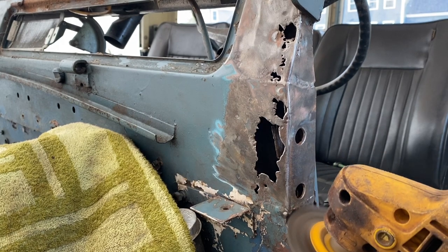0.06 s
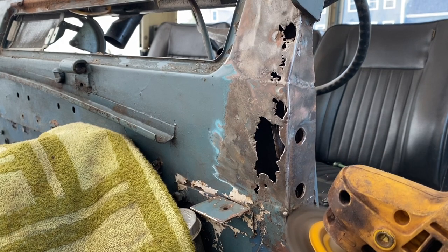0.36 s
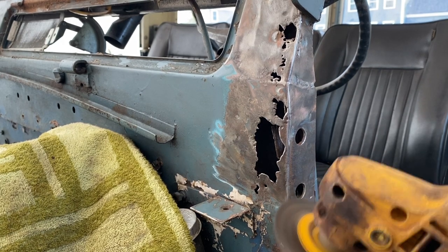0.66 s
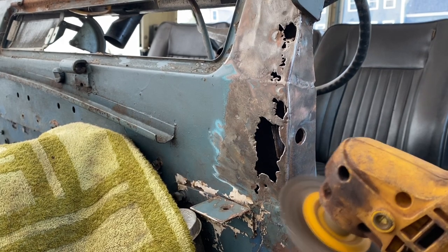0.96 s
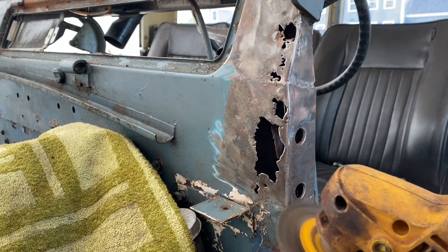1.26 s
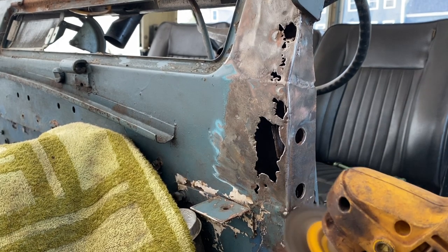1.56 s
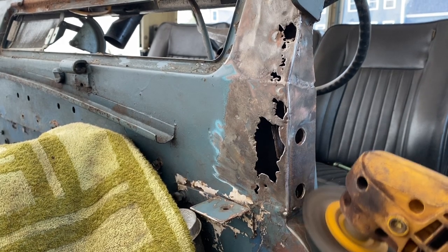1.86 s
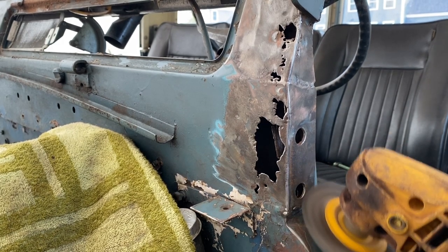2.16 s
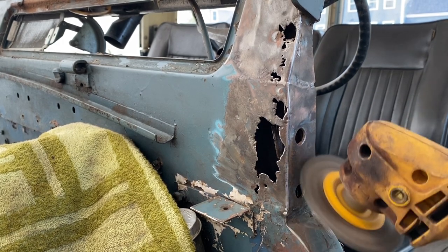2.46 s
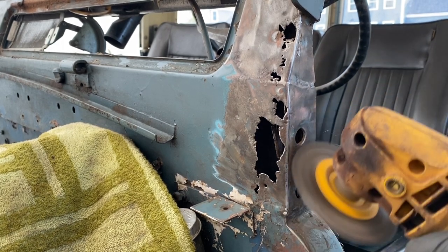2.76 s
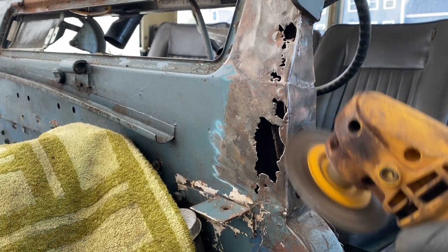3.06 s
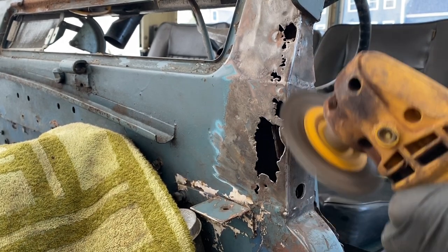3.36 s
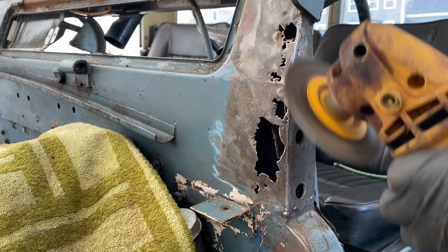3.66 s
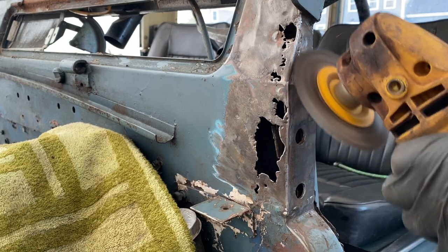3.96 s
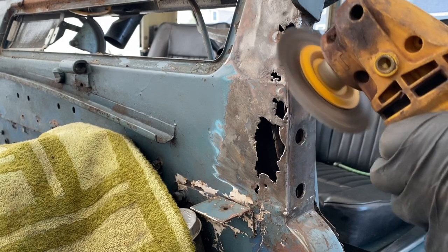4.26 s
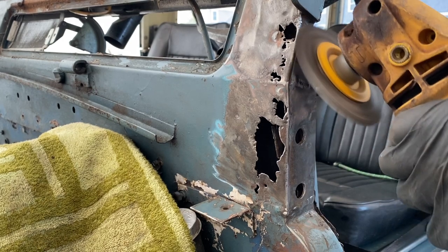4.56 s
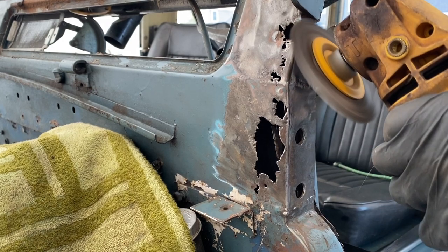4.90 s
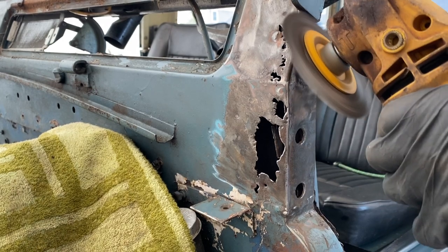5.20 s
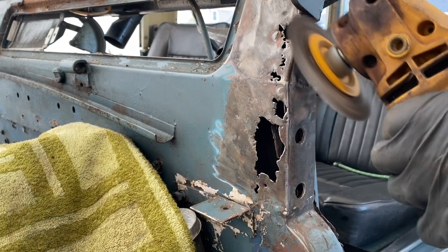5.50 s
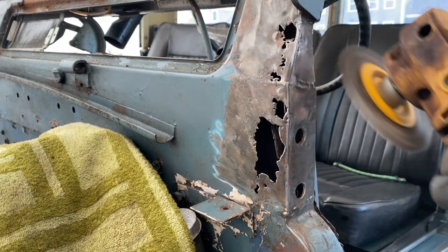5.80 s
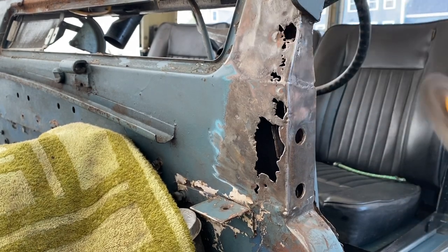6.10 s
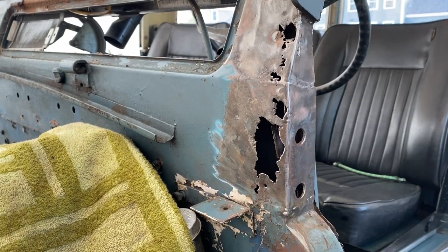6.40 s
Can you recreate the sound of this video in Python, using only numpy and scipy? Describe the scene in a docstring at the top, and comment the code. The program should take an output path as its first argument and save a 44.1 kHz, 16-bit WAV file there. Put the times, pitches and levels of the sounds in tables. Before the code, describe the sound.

Close up, a wire wheel on an angle grinder is pressed repeatedly against rusty car steel in a workshop. The bristles scratch and hiss while the metal gives a high, chattering whine that sags in pitch under pressure. The motor and fan run underneath, and low puffs of air hit the microphone early on. Finally the scrubbing stops, and the free wheel whirs faster, then begins winding down.

```python
"""In a workshop, an angle grinder with a wire wheel scrubs the rusty door pillar of a stripped car.
Its draught buffets the microphone, its fan rushes, its motor and gears sing with the wheel speed.
It is pressed on in short strokes: the wires hiss, rasp and snag, the tufts make the steel whine.
Near the end it is lifted off, spins up freely and coasts down."""
import sys
import numpy as np
from scipy import signal
from scipy.fft import rfft, irfft
from scipy.io import wavfile
from scipy.ndimage import uniform_filter1d, map_coordinates

SR = 44100
rng = np.random.default_rng(int(sys.argv[2]) if len(sys.argv) > 2 else 0)


def pcm_store(signal):
    """Save signal as 16-bit PCM."""
    levels = np.round(np.clip(np.atleast_2d(signal), -1, 1) * 32767)
    wavfile.write(sys.argv[1], SR, levels.astype(np.int16).T)


N = 293000
TIME = np.arange(N) / SR
FREQS = np.maximum(np.fft.rfftfreq(N, 1 / SR), 1)
CUTOFF_HZ = 15900


def from_db(db):
    """Decibels to gain."""
    return 10 ** (np.asarray(db) / 20)


def unit_rms(x):
    """Scale to rms 1."""
    return x / np.sqrt(np.mean(x ** 2) + 1e-20)


def evened(x, span_s):
    """Hold the running rms near 1."""
    power = np.mean(np.atleast_2d(x) ** 2, axis=0)
    return x / np.sqrt(uniform_filter1d(power, int(span_s * SR)) + 1e-9)


def in_time(rows):
    """Interpolate each column at every sample."""
    time_s, *columns = np.transpose(rows)
    return [np.interp(TIME, time_s, column) for column in columns]


def over_hz(points):
    """Interpolate over log frequency."""
    hz, value = np.transpose(points)
    return np.interp(np.log(FREQS), np.log(hz), value)


def bump(centre_s, sigma_s):
    """Gaussian swell, height 1."""
    return np.exp(-.5 * np.minimum(((TIME - centre_s) / sigma_s) ** 2, 60))


def white():
    """Two independent white noises."""
    return rng.standard_normal((2, N))


def drift(rate_hz, size=73728):
    """Random wander, rolled off above rate_hz; rms 1."""
    slow = irfft(rfft(rng.standard_normal(size)) / (1 + (FREQS[:size // 2 + 1] / rate_hz) ** 2))
    return unit_rms(np.interp(np.linspace(0, size - 1, N), np.arange(size), slow))


def resonant(x, modes):
    """Each row boosts or cuts the band around its frequency."""
    response = 1 + sum((from_db(db) - 1) / (1 + 2j * (FREQS - hz) / width) for hz, width, db in modes)
    return irfft(rfft(x) * response, N)


def cabin(x, t60_s, wet_db):
    """Dense short echoes of the bare body shell, different on each side."""
    t = TIME[:SR // 2]
    echoes = rng.standard_normal((2, len(t))) * from_db(-60 * t / t60_s) * (t > .002)
    echoes /= np.sqrt(np.sum(echoes ** 2, axis=1, keepdims=True))
    return x + from_db(wet_db) * signal.fftconvolve(x, echoes, axes=1)[:, :N]


# left-right similarity: freq_hz, likeness (unclipped)
STEREO_LIKENESS = [(60, 0.94), (200, 1), (450, 0.26), (1200, 0.5), (2300, 0.68), (3300, 0.4), (4200, 0.33),
                   (5700, -0.26), (6700, 0.5), (7500, 0.8), (8400, -4), (10500, 1.05), (12000, -1),
                   (13400, 1), (15200, -11)]

def coloured(pair, spectrum, width=1):
    """Shape two independent signals into mid and side with this spectrum; stereo, rms 1."""
    alike = np.clip(over_hz(STEREO_LIKENESS), -.9, .95)
    mid, side = irfft(rfft(pair) * from_db(over_hz(spectrum)) * np.sqrt([1 + alike, 1 - alike]), N)
    return unit_rms(np.array([mid + width * side, mid - width * side]))


# draught, fading as the wheel moves up the pillar: time_s, level_db
DRAUGHT_LEVEL = [(0, -50), (.3, -46), (.7, -44.5), (1.1, -38), (1.65, -49), (2.05, -41.5), (2.4, -44),
                 (2.55, -50), (2.8, -51), (3.2, -41), (3.6, -45.5), (3.9, -52.5), (4.48, -51.5), (4.6, -63),
                 (5.8, -62), (6.64, -60)]
# stereo width of the wind rumble, wide at first, narrowing after two seconds: time_s, side_gain_db
DRAUGHT_WIDTH = [(0, 7.5), (1.7, 12), (2.1, -2), (5, -64), (6.64, 11)]
# the wheel's jet sweeps the microphone: centre_s, peak_db, sigma_s
GUSTS = [(0.024, -29, .008), (0.12, -34, .014), (0.424, -28, 0.0081), (0.569, -37, .012), (0.68, -39, .015),
         (0.887, -36, 0.017), (1.194, -35, 0.016), (1.434, -38, 0.016), (1.59, -38, 0.012),
         (1.77, -40, 0.028), (1.979, -33.5, 0.018), (2.2, -35, 0.012), (2.268, -30, 0.024),
         (2.352, -32, 0.017), (2.635, -28.5, .009), (2.664, -34, 0.008), (2.868, -36, .007),
         (2.9, -29, 0.018), (2.968, -38, .015), (3.089, -31, .012), (3.146, -29.5, 0.014),
         (3.276, -32.5, .02), (3.375, -32, 0.014), (3.416, -28, 0.014), (3.556, -41, .015),
         (6.026, -42, .012)]
# wind spectra: freq_hz, density_db
DRAUGHT_SPECTRUM = [(15, -24), (28, -21), (45, 3), (65, 2.5), (100, 0), (150, -6), (220, -10), (350, -19.5),
                    (800, -30.5)]
GUST_SPECTRUM = [(20, -17), (55, 1.5), (130, 3.5), (230, -7), (380, -12), (900, -24)]

def draught():
    """Air flung off the wheel hits the microphone in lumps."""
    level_db, = in_time(DRAUGHT_LEVEL)
    width = from_db(in_time(DRAUGHT_WIDTH)[0])
    lumps_db = 2.8 * drift(12)
    rumble = from_db(level_db + lumps_db) * coloured(white(), DRAUGHT_SPECTRUM, width)
    gust_gain = sum(from_db(db) * bump(centre_s, sigma_s) for centre_s, db, sigma_s in GUSTS)
    gusts = gust_gain * coloured(white(), GUST_SPECTRUM, width)
    return (rumble + gusts) * from_db([[.7], [-.7]])


# fan rush: time_s, level_db
FAN_LEVEL = [(0, -31), (1.3, -32.5), (1.6, -33.5), (2.25, -30), (4.2, -32.5), (4.3, -33), (5.7, -33.5),
             (6.08, -29.5), (6.58, -35)]
# fan rush: freq_hz, density_db
FAN_SPECTRUM = [(40, -36), (130, -59), (230, -18.5), (420, -8), (600, -3.5), (800, -2.5), (1100, 2),
                (1600, 0.5), (2200, -1.5), (2900, -1), (3800, -7.5), (6500, -8.5), (9000, -40),
                (16000, -27)]
# car body cavities: freq_hz, width_hz, gain_db
BODY_MODES = [(445, 40, 3), (775, 72, 5.5), (901, 16, 7.5), (1294, 48, 2.5), (1400, 40, 2),
              (1673, 200, 3.5), (1860, 140, 2.5)]
# vent direction: freq_hz, left_minus_right_db
VENT_BALANCE = [(300, -3.5), (600, -0.5), (1100, -2), (2200, -2.5), (5000, 4)]

def fan():
    """The cooling fan blows through the vents into the hollow car body."""
    level_db, = in_time(FAN_LEVEL)
    rush = unit_rms(resonant(coloured(white(), FAN_SPECTRUM), BODY_MODES))
    rush *= from_db(level_db + 1.42 * drift(32))
    balance = from_db(over_hz(VENT_BALANCE) * np.c_[[.5, -.5]])
    return irfft(rfft(rush) * balance, N)


# wire swish, strongest when spinning freely: time_s, level_db
SWISH_LEVEL = [(0, -44), (5.6, -39.5), (5.8, -40), (5.95, -31.5), (6.08, -32), (6.25, -33), (6.38, -36.5),
               (6.5, -41.5), (6.64, -43.5)]
# wire swish: freq_hz, density_db
SWISH_SPECTRUM = [(2500, -10), (3300, 4.5), (4400, -8), (5500, -5), (6600, 12), (7600, 10), (8300, 0),
                  (9500, 9), (10600, 7.5), (11500, 8), (12400, 2), (13600, -18), (16000, -20)]
WHIRRS_PER_TURN, WHIRR_WIDTH_HZ, WHIRR_DB = 10, 90, -8

def swish(turns):
    """Wires cut the air with a swish and a breathy whirr, throbbing once a turn."""
    level_db, = in_time(SWISH_LEVEL)
    noise = coloured(white(), SWISH_SPECTRUM)
    eddies = np.array([drift(WHIRR_WIDTH_HZ) + 1j * drift(WHIRR_WIDTH_HZ) for _ in range(2)])
    carrier = np.exp(2j * np.pi * WHIRRS_PER_TURN * turns)
    whirr = unit_rms(np.real((eddies + eddies.mean(axis=0)) * carrier))
    throb_db = np.cos(2 * np.pi * turns)
    return (noise + from_db(WHIRR_DB) * whirr) * from_db(level_db + throb_db)


# wheel on steel: time_s, contact_db
CONTACT = [(.93, 0), (1.0, -11), (1.05, 0), (3.22, 0), (3.33, -12), (3.38, 0), (5.62, 0), (5.72, -6),
           (6.0, -35)]

def contact():
    """Contact gain: the wires lift briefly twice, then leave the steel."""
    return from_db(in_time(CONTACT)[0])


def lopsided(turns):
    """The uneven wheel's pressure swings within each turn; rms 1."""
    angle = 2 * np.pi * turns
    swings = ((drift(3.2) * np.cos(k * angle) + drift(7.4) * np.sin(k * angle)) / k for k in (1, 2, 3))
    return unit_rms(sum(swings))


def motor_tone(cycles, level_db, flutter_db, jitter_rad):
    """A sine locked to a rotating part, wavering in level and phase."""
    level = unit_rms(from_db(flutter_db * drift(20))) * from_db(level_db)
    fray_rad = .35 * drift(170)
    return np.sqrt(2) * level * np.sin(2 * np.pi * cycles + jitter_rad * drift(60) + fray_rad)


GEAR_TEETH, PINION_TEETH, ARMATURE_SLOTS = 37, 12, 13
GEAR_RATIO = GEAR_TEETH / PINION_TEETH
# armature slot tone: time_s, level_db, octave_db
SLOT_LEVELS = [(0, -46, -58), (1.0, -49, -48), (1.45, -50, -60), (1.7, -48, -57), (2.1, -49, -56),
               (2.6, -41, -60), (3.3, -47, -65), (3.6, -45, -60), (4.5, -48, -62), (5.3, -40, -58),
               (5.6, -51, -62), (5.75, -51, -42), (5.93, -49, -58), (6.09, -45.5, -52), (6.25, -42, -58),
               (6.5, -47.5, -50), (6.64, -49, -50)]
# slot tone flares: centre_s, boost_db, sigma_s
SLOT_FLARES = [(2.27, 6, .04), (2.41, 6, .035), (2.6, 6, .04), (3.025, 12, .015), (5.74, 12, .022),
               (5.85, 12, .02), (6.085, 13, .045), (6.33, 7, .03), (6.5, 13, .04)]
# gear mesh tone: time_s, level_db
GEAR_LEVEL = [(0, -58), (.4, -73), (5.8, -51), (6.15, -51), (6.35, -39.5), (6.6, -63)]
# unbalance hum: time_s, level_db
HUM_LEVEL = [(0, -51), (3.2, -53.5), (4.8, -56), (4.97, -48), (5.6, -49), (5.8, -53.5), (6.35, -58),
             (6.55, -53)]
# hum partials: cycles_per_turn, relative_db
HUM_PARTIALS = [(0.94, -14.5), (GEAR_RATIO, -0.68), (2 * GEAR_RATIO, 0)]

def drive(turns):
    """Slots and gears sing with the motor speed, load shakes the slot tone, unbalance hums."""
    slot_db, octave_db = in_time(SLOT_LEVELS)
    slot_db += sum(db * bump(centre_s, sigma_s) for centre_s, db, sigma_s in SLOT_FLARES)
    gear_db, = in_time(GEAR_LEVEL)
    hum_db, = in_time(HUM_LEVEL)
    load = contact()
    flutter_db = 1.5 + 2 * load
    slot_cycles = ARMATURE_SLOTS * GEAR_RATIO * turns
    slots = motor_tone(slot_cycles, slot_db, flutter_db, jitter_rad=.5)
    slots += motor_tone(2 * slot_cycles, octave_db, flutter_db, jitter_rad=.5)
    slots *= 1 + .3 * load * lopsided(turns)
    gears = motor_tone(GEAR_TEETH * turns, gear_db, flutter_db=1.5, jitter_rad=.87)
    hum = sum(motor_tone(k * turns, hum_db + db, flutter_db=3.5, jitter_rad=.64)
              for k, db in HUM_PARTIALS)
    return cabin((slots + gears) * np.ones((2, 1)), t60_s=.035, wet_db=-5) + hum


# grinder position: time_s, left_lag_ms, left_minus_right_db
BEARING = [(0, 0, 0), (5.65, 0, -1), (5.88, 0.059, -1.5), (6.05, 0.14, -0.5), (6.3, 0.12, -1.5),
           (6.64, 0.2, -1.5)]

def placed(x):
    """As the grinder moves right, its sound reaches the left side later and weaker."""
    lag_ms, pan_db = in_time(BEARING)
    left = map_coordinates(x[0], [np.arange(N) - lag_ms * SR / 1000], order=3, mode="nearest")
    return np.array([left * from_db(pan_db / 2), x[1] * from_db(-pan_db / 2)])


# snagged edges: centre_s, peak_db, sigma_s, pitch_hz, half_width_hz
CATCHES = [(.37, -47, .06, 4200, 80), (.62, -43, .035, 8000, 70), (1.22, -34, .035, 10830, 110),
           (1.532, -33.5, .015, 5080, 50), (1.836, -48, 0.022, 5370, 120), (1.84, -45, .025, 8060, 70),
           (2.257, -37, 0.056, 11100, 60), (2.47, -38, .035, 9520, 60), (2.631, -31, 0.024, 9850, 60),
           (2.636, -32, .022, 10340, 60), (2.803, -34, 0.056, 10900, 60), (2.74, -38, .015, 5150, 50),
           (2.854, -25, .012, 5650, 35), (2.855, -31, 0.011, 7140, 500), (2.96, -39, .03, 5530, 40),
           (3.088, -40, .015, 5070, 50), (3.103, -31, .015, 5650, 50), (3.145, -38, .03, 10100, 90),
           (3.529, -33.5, 0.04, 10900, 90), (3.74, -40, .035, 8330, 120), (4.018, -33.5, 0.028, 4100, 100),
           (4.03, -34, 0.017, 4750, 60), (4.174, -33, .02, 4090, 50), (4.178, -34, 0.038, 4520, 200),
           (4.448, -37.5, 0.058, 4150, 80), (4.663, -43, 0.046, 7870, 70), (5.24, -38, .04, 6170, 40.3),
           (5.24, -43, .04, 5800, 40), (5.528, -39, .025, 6160, 80)]

def catches():
    """Wires catch an edge, which rings briefly as a narrow band of noise."""
    out = np.zeros((2, N))
    size = SR // 2
    freqs = np.fft.rfftfreq(size, 1 / SR)
    for centre_s, peak_db, sigma_s, pitch_hz, half_width_hz in CATCHES:
        noise = rng.standard_normal((2, size)) + rng.standard_normal(size)
        ring = irfft(rfft(noise) / (1 + ((freqs - pitch_hz) / half_width_hz) ** 2), size)
        ring = evened(unit_rms(ring), span_s=.03)
        start = max(int(centre_s * SR) - size // 2, 0)
        span = slice(start, start + size)
        out[:, span] += ring * from_db(peak_db) * bump(centre_s, sigma_s)[span]
    return out


def wire_strikes(turns, repeat, memory, per_turn=384):
    """The same wires strike every turn, slowly bending into new places; loose rust adds fresh grains."""
    pattern = rng.standard_normal((2, int(turns[-1]) + 2, per_turn))
    pattern[:, 0] /= np.sqrt(1 - memory ** 2)   # start at steady-state level
    pattern = signal.lfilter([1], [1, -memory], pattern, axis=1).reshape(2, -1)
    locked = np.array([map_coordinates(p, [turns * per_turn], order=3, mode="nearest") for p in pattern])
    grains = white() * from_db(3 * drift(2000))
    return np.sqrt(repeat) * unit_rms(locked) + np.sqrt(1 - repeat) * unit_rms(grains)


def wire_rings(x, patchy_db, bands=22):
    """Wires of many lengths ring in turn, so each band swells and fades on its own."""
    spectrum, out = rfft(x), 0
    centres_hz, step_hz = np.linspace(0, CUTOFF_HZ, bands, retstep=True)
    for hz in centres_hz:
        band = np.maximum(1 - np.abs(FREQS - hz) / step_hz, 0)
        out += irfft(spectrum * band, N) * from_db(patchy_db * drift(33))
    return unit_rms(out)


def zings(turns, per_s=200, rise_s=.02, range_hz=(4900, 12600)):
    """Single wires flick off the rust and ring, each at its own pitch, rattled on every turn."""
    t, out = TIME[:SR // 6], np.zeros(N + SR)
    swell = t / rise_s * np.exp(1 - t / rise_s)
    for when, pitch, strength in rng.random((int(per_s * N / SR), 3)):
        start = int(when * N)
        pitch_hz = np.interp(pitch, [0, 1], range_hz)
        out[start:start + len(t)] += 2 * strength * swell * np.sin(2 * np.pi * pitch_hz * t)
    return from_db(-16) * out[:N] * (1 + .5 * lopsided(turns))


# phase between the microphone ports: freq_hz, left_lead_rad
PORT_PHASE = [(0, -2.5), (1640, -1.5), (5000, 2), (6890, -1.5), (9990, -5), (11900, -7.5), (12700, -8.5),
              (14200, -11.5), (14900, -8.5), (16500, -7)]

def at_ports(pair, spectrum, scatter_db=-42):
    """A close source reaches the two ports out of step, over a little scatter; rms 1."""
    direct, scatter = rfft(pair) * from_db(over_hz(spectrum)) * from_db(np.c_[[0, scatter_db]])
    lead = np.exp(1j * np.interp(FREQS, *np.transpose(PORT_PHASE)))
    return unit_rms(irfft(np.array([(direct + scatter) * lead, direct - scatter]), N))


# scrubbing spectra: freq_hz, density_db
HISS_SPECTRUM = [(2000, -56), (4200, -3.5), (5200, 4), (6200, -5), (7200, -3.5), (8400, -2.5), (9700, 3.5),
                 (11000, 1.5), (12300, 6), (13600, -16), (15200, 10), (16000, -8)]
RASP_SPECTRUM = [(200, -13), (500, -24), (1200, 3), (2000, 7.5), (2700, 3.5), (3300, 6.5), (4100, 1),
                 (5100, -2), (6000, -6), (7500, 1), (11000, -37)]
# narrow peaks and dips that colour the treble hiss: freq_hz, width_hz, gain_db
HISS_PEAKS = [(8010, 150, 15), (8300, 120, -17), (9260, 160, 7.5), (9550, 150, 3), (10840, 120, 2.5),
              (11700, 220, -4.5)]
# ringing of the pillar's sheet steel: freq_hz, width_hz, gain_db
PILLAR_MODES = [(913, 14, 15.5), (1230, 150, 6.5), (2157, 30, 6.5), (2820, 68, 9.5), (3060, 140, 4),
                (3750, 44, -15), (3990, 37, 1), (5126, 200, 12.5), (6210, 80, 9), (6230, 320, 10.5),
                (6830, 270, 8)]

def scrubbing(turns, hiss_gain, rasp_gain):
    """Wire tips hiss on the rust and set the pillar rasping."""
    pressure_db = .14 * lopsided(turns) + .91 * drift(31)
    tips = wire_rings(wire_strikes(turns, repeat=.65, memory=.89), patchy_db=2.2)
    blows = wire_rings(wire_strikes(turns, repeat=.78, memory=.852), patchy_db=2.5)
    hiss = unit_rms(resonant(at_ports(tips + zings(turns), HISS_SPECTRUM), HISS_PEAKS))
    rasp = unit_rms(resonant(coloured(blows, RASP_SPECTRUM), PILLAR_MODES))
    return (hiss * hiss_gain + rasp * rasp_gain) * from_db(pressure_db)


def tuft_tone(turns, harmonic, chatter, uneven, flutter_db, jitter_rad, lead_rad, tufts=19):
    """One partial of the tuft rate; the uneven wheel adds sidebands, chatter frays it."""
    phase = 2 * np.pi * tufts * harmonic * turns + jitter_rad * drift(21)
    sidebands = uneven * (lopsided(turns) + 1j * lopsided(turns))
    fray = .7 * chatter * (drift(44) + 1j * drift(94))
    tone = (1 + sidebands + fray) * from_db(flutter_db * drift(23)) * np.exp(1j * phase)
    return unit_rms(np.real([tone * np.exp(1j * lead_rad), tone]))


# wheel chatter on pitted steel: time_s, roughness (0-1)
CHATTER = [(0, .55), (.5, .55), (.63, .25), (.76, .9), (.92, .8), (1.24, .25), (1.4, .9), (1.6, .7),
           (2.2, .22), (3.13, .16), (3.2, .6), (3.35, .4), (3.62, .16), (4.1, .2), (4.22, .55), (4.45, .4),
           (4.7, .7), (4.9, .7), (5.15, .06), (5.4, .06), (5.53, .15), (5.6, .5)]
# steel resonance that makes the octave squeal: freq_hz, width_hz, gain_db
SQUEAL_MODES = [(5130, 300, 10)]
# wheel skips: centre_s
SKIPS_S = [2.32, 2.442, 2.67, 2.705, 2.735, 2.838, 2.879, 2.903, 2.945, 3.014, 3.113, 3.203, 3.639, 3.7,
           3.742, 4.07, 4.14, 4.198]
SKIP_DB, SKIP_SIGMA_S = -14, .004

def whine(turns, whine_gain, octave_gain):
    """Tufts beat on the steel in step; chatter roughens the tone, each skip dips the fundamental."""
    chatter, = in_time(CHATTER)
    fundamental = tuft_tone(turns, 1, chatter, uneven=.07 + .2 * chatter,
                            flutter_db=4 * chatter, jitter_rad=.18, lead_rad=.8)
    octave = tuft_tone(turns, 2, chatter, uneven=.18 + .35 * chatter,
                       flutter_db=2 + 3 * chatter, jitter_rad=.28, lead_rad=.9)
    fundamental = evened(fundamental, span_s=.1)
    octave = evened(resonant(octave, SQUEAL_MODES), span_s=.08)
    skips_db = SKIP_DB * sum(bump(centre_s, SKIP_SIGMA_S) for centre_s in SKIPS_S)
    return whine_gain * fundamental * from_db(skips_db) + octave_gain * octave


# wheel pressed on: start_s, length_s, hiss_db, rasp_db, whine_db, octave_db
STROKES = [(0.0, 0.24, -35.5, -34.5, -47, -54), (0.293, 0.26, -34.5, -34.5, -38, -38.5),
           (0.585, 0.085, -28.5, -34.5, -33.5, -28), (0.68, 0.26, -42, -34.5, -37, -39.5),
           (1.026, 0.19, -32, -34, -35, -55), (1.208, 0.11, -34, -31.5, -39, -31.5),
           (1.29, 0.25, -40, -36, -38, -39.5), (1.577, 0.18, -46, -36.5, -44, -51),
           (1.797, 0.058, -29.5, -36, -56, -37), (1.91, 0.32, -38.5, -37.5, -38, -58),
           (2.234, 0.17, -33, -34.5, -32, -48), (2.31, 0.055, -40, -44, -27.5, -54),
           (2.445, 0.2, -31.5, -36, -35, -57), (2.564, 0.05, -38, -42, -27.5, -46),
           (2.616, 0.048, -31.5, -38, -24.5, -38), (2.683, 0.099, -32, -35, -29, -49),
           (2.77, 0.072, -31, -30, -25, -52), (2.846, 0.015, -24.5, -32, -21.5, -35),
           (2.884, 0.008, -35, -37, -19, -49), (2.907, 0.019, -42, -44, -31, -44),
           (2.961, 0.014, -33, -36, -21, -32), (3.017, 0.014, -46, -46, -26.5, -52),
           (3.067, 0.034, -27, -29.5, -21.5, -45), (3.125, 0.019, -26, -29.5, -20, -31),
           (3.17, 0.096, -34, -34, -30.5, -35.5), (3.365, 0.028, -32, -31, -30.5, -51),
           (3.517, 0.087, -32.5, -33.5, -32, -40), (3.578, 0.052, -44, -44, -25.5, -55),
           (3.638, 0.053, -28.5, -35, -23, -48), (3.688, 0.093, -29, -30.5, -28.5, -36),
           (3.712, 0.02, -31, -45, -27, -42), (3.916, 0.099, -33.5, -30.5, -29, -45),
           (4.003, 0.045, -23.5, -38, -20.5, -39), (4.085, 0.033, -23.5, -35, -25.5, -47),
           (4.146, 0.031, -24, -30, -27.5, -35), (4.19, 0.066, -27.5, -35.5, -30.5, -31),
           (4.33, 0.11, -32, -39.5, -39.5, -36), (4.432, 0.036, -25, -31.5, -29, -45),
           (4.614, 0.17, -31.5, -34, -36.5, -32), (4.81, 0.12, -37.5, -42, -45, -48),
           (4.907, 0.16, -31, -39, -37, -38.5), (5.092, 0.048, -32.5, -42, -29.5, -33),
           (5.154, 0.17, -33.5, -40, -25, -37.5), (5.346, 0.024, -28, -46, -28, -35),
           (5.489, 0.092, -30, -34, -25, -37.5)]
# light touch between strokes: hiss_db, rasp_db, whine_db, octave_db
GRAZE_DB = [-34.5, -51.5, -66, -50]
# stroke decay: hiss_s, rasp_s, whine_s, octave_s
RELEASE_S = [0.081, 0.11, 0.025, 0.016]

def stroke_gains(attack_s=.031):
    """Each stroke swells, holds and decays over a light graze; gains of hiss, rasp, whine, octave."""
    power = np.outer(from_db(GRAZE_DB), np.ones(N)) ** 2
    for start_s, length_s, *levels_db in STROKES:
        attack = np.clip((TIME - start_s) / attack_s + .5, 0, 1)
        release = np.exp(-np.clip((TIME - start_s - length_s) / np.c_[RELEASE_S], 0, 20))
        power += (np.c_[from_db(levels_db)] * attack * release) ** 2
    return np.sqrt(power) * contact()


# wheel speed, sagging under load: time_s, turns_per_s
WHEEL_SPEED = [(0, 142), (.38, 139), (.58, 136.4), (.66, 134), (.73, 127), (.91, 130), (1.04, 141.2),
               (1.18, 142.5), (1.22, 140.6), (1.36, 125.5), (1.45, 127.5), (1.7, 141), (1.88, 140.7),
               (2.17, 150.4), (2.37, 148.3), (2.67, 148.6), (2.82, 150.5), (2.9, 145), (3.0, 145.3),
               (3.09, 148.5), (3.145, 144.2), (3.215, 132.5), (3.28, 134.8), (3.37, 143), (3.66, 148.8),
               (3.78, 140.6), (3.97, 149.2), (4.11, 145.3), (4.24, 129.5), (4.37, 137.2), (4.62, 140.5),
               (4.75, 131), (4.89, 134.4), (5.08, 127.5), (5.17, 121.2), (5.3, 121.1), (5.46, 123.8),
               (5.6, 113.9), (5.73, 131), (5.9, 147.5), (6.1, 156.3), (6.52, 129), (6.65, 123.3)]

def scene():
    """One wheel rotation times the whine, scrubbing, drive and swish; catches, fan and draught join."""
    turns_per_s, = in_time(WHEEL_SPEED)
    turns = np.cumsum(turns_per_s) / SR
    hiss_gain, rasp_gain, whine_gain, octave_gain = stroke_gains()
    singing = cabin(whine(turns, whine_gain, octave_gain), t60_s=.08, wet_db=-13)
    steel = singing + scrubbing(turns, hiss_gain, rasp_gain) + catches()
    grinder = placed(drive(turns) + fan() + swish(turns))
    return draught() + grinder + steel


def record(dry):
    """Steep low-pass on the top treble."""
    return signal.sosfilt(signal.ellip(10, .1, 80, CUTOFF_HZ, fs=SR, output="sos"), dry)


dry = scene()
out = record(dry)
pcm_store(out)
```